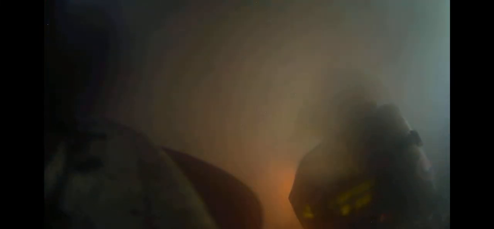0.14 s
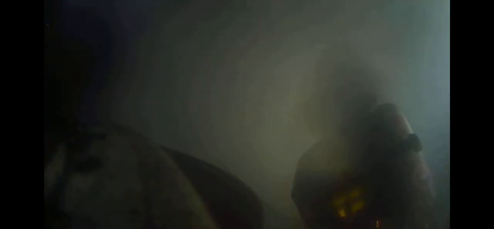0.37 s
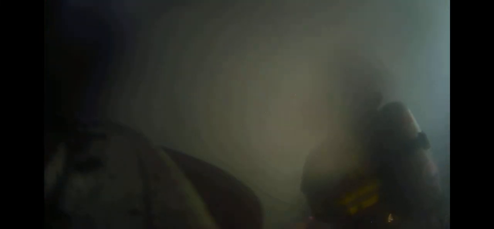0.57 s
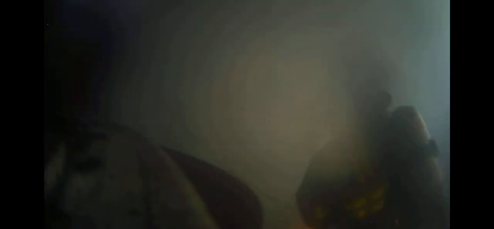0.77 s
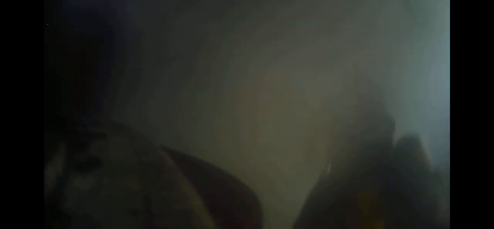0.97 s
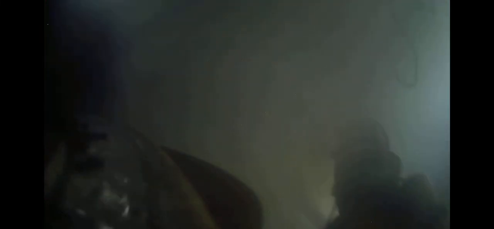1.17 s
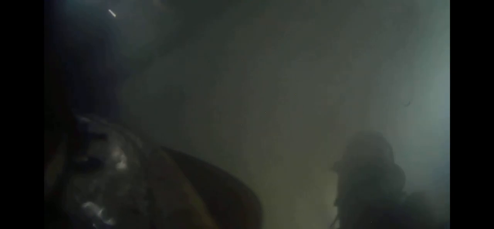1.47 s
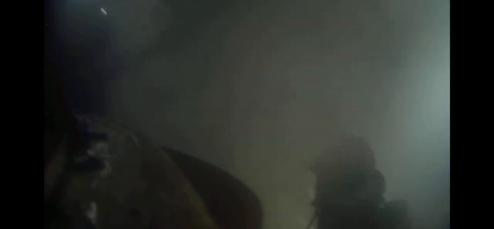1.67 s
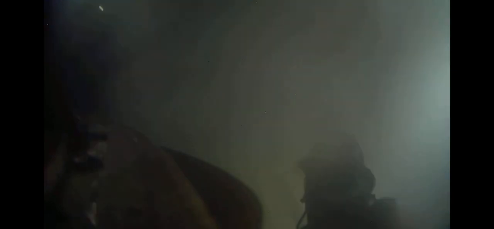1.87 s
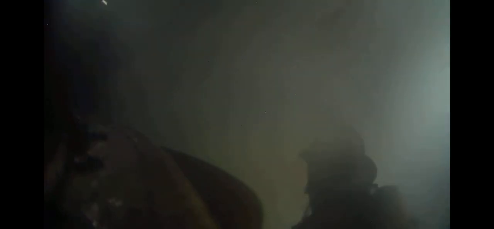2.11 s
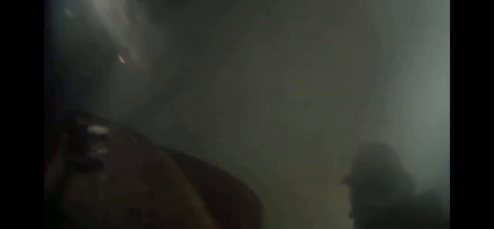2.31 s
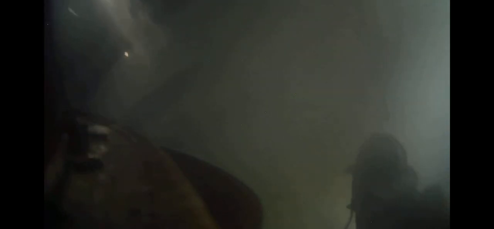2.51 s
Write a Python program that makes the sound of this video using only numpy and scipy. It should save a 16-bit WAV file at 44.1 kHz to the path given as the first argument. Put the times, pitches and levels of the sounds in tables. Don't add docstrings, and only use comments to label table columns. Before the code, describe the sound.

A fire hose jet hisses and surges close by, muffled, with low bumps of gear inside a smoky building

```python
import sys
import numpy as np
from scipy import signal
from scipy.io import wavfile
from scipy.ndimage import uniform_filter1d

SR = 44100
rng = np.random.default_rng(int(sys.argv[2]) if len(sys.argv) > 2 else 0)


def generate_wav(sig):
    pcm = np.round(np.clip(np.atleast_2d(sig).T, -1, 1) * 32767).astype(np.int16)
    wavfile.write(sys.argv[1], SR, pcm)


def decibels_to_gain(level_db):
    exponent = np.asarray(level_db, float) / 20
    return 10 ** exponent


N = 116865
TIME_S = np.arange(N) / SR


def evened(x):
    return x / np.sqrt(np.mean(x ** 2) + 1e-20)


def read(points, hz):
    f, value = np.transpose(points)
    return np.interp(np.log(hz + 1), np.log(f + 1), value)


def add(mix, s, sound):
    part = mix[max(round(s * SR), 0):][:len(sound)]
    part += sound[:len(part)]


def drifting(n, size):
    smooth = uniform_filter1d(rng.standard_normal(n), size=size)
    return evened(uniform_filter1d(smooth, size=size))


def patchy(x, gain, patch_db, size=512):
    overlap = size * 3 // 4
    hz, _, z = signal.stft(x, SR, nperseg=size, noverlap=overlap)
    patches = uniform_filter1d(rng.standard_normal(z.shape), size=3, axis=0)
    patches = evened(uniform_filter1d(patches, size=20, axis=1))
    z = z * gain(hz)[:, None] * decibels_to_gain(patch_db * patches)
    return evened(signal.istft(z, SR, nperseg=size, noverlap=overlap)[1][:N])


def modes(table):
    return lambda hz: np.sqrt(sum((decibels_to_gain(db) / (1 + (2 * (hz - f) / w) ** 2)) ** 2 for f, w, db in table))


def swing(s, hz, db, half):
    t = TIME_S - s
    return decibels_to_gain(db) * np.exp(-(t / half) ** 2) * np.cos(2 * np.pi * hz * t)


def struck(t, hz, db, t60, rise_s):
    return decibels_to_gain(db - 60 * t / t60) * np.minimum(t / rise_s, 1) * np.sin(2 * np.pi * hz * t)


def jet_force():
    # time in seconds, level in dB, tilt of the fine spray in dB.
    jet_path = [(0.0, -43, -2.5), (0.31, -48, -3.5), (0.55, -56.5, 6), (0.71, -43.5, 2.5), (0.94, -46.5, 2),
                (1.11, -49, 3.5), (1.59, -48.5, 2), (1.74, -52.5, 4), (1.87, -49, 1.5), (2.32, -51.5, 0.5),
                (2.65, -46, 2)]
    # centre in seconds, level in dB, half width in seconds, fine spray in dB.
    surges = [(.02, -54, 0.038, 0), (.14, -45, 0.036, 6.5), (0.228, -43.5, 0.027, -1),
              (0.364, -44.5, 0.017, -9), (.47, -48, 0.036, 1.5), (0.544, -42, 0.042, 4.5),
              (0.593, -40.5, 0.029, -15), (.668, -42, 0.019, -5), (.702, -35.5, .024, 1.5),
              (.75, -42.5, 0.026, -17), (.81, -49, 0.037, 6), (0.858, -40.5, 0.023, -4),
              (0.962, -47.5, 0.0087, 6), (1.055, -44, 0.032, -3), (1.118, -47, 0.022, -1),
              (2.035, -45.5, 0.018, 0.5), (1.379, -41.5, 0.04, 2), (1.35, -56, 0.016, -4),
              (1.431, -42, 0.023, -26), (1.576, -43.5, 0.028, 1), (1.71, -48.5, 0.028, 3),
              (1.77, -43.5, 0.038, -2.5), (1.92, -45, 0.0086, 5.5), (.16, -50, .01, 10),
              (1.39, -53, .03, 8), (2.09, -42.5, .02, -6), (1.82, -49.5, 0.016, -1),
              (2.235, -50.5, .006, 7), (2.077, -32.5, 0.011, -1.5), (2.118, -44.5, 0.028, 1.5),
              (2.247, -46, 0.02, 3.5), (2.348, -45.5, 0.016, -2), (2.411, -43.5, 0.016, -5),
              (2.52, -46.5, 0.049, -0.5), (2.61, -56, 0.025, -6)]
    fall_over_rise = 0.96
    s, db, tilt_db = np.transpose(jet_path)
    body = decibels_to_gain(np.interp(TIME_S, s, db)) ** 2
    fine = body * decibels_to_gain(np.interp(TIME_S, s, tilt_db)) ** 2
    for at, top_db, half, fine_db in surges:
        width = half * np.where(TIME_S > at, fall_over_rise, 1)
        swell = decibels_to_gain(top_db) ** 2 * np.exp(-((TIME_S - at) / width) ** 2)
        body = body + swell
        fine = fine + swell * decibels_to_gain(fine_db) ** 2
    return np.sqrt(body), np.sqrt(fine)


def water():
    drops_per_s, drop_spread_db, drop_share, flicker_db = 3000, 2, .25, 1
    drops = decibels_to_gain(drop_spread_db * np.minimum(rng.exponential(1, N), 3.5))
    drops = drops * (rng.random(N) < drops_per_s / SR)
    drops = drops * rng.choice([-1., 1.], N)
    flicker = decibels_to_gain(flicker_db * drifting(N, 500))
    hiss = rng.standard_normal(N)
    return flicker * (np.sqrt(drop_share) * evened(drops) + np.sqrt(1 - drop_share) * hiss)


def spray(body, fine):
    # pitch in Hz, width in Hz, level in dB.
    body_modes = [(1204, 33, -2), (1389, 183, 2.5), (1644, 355, -1.5), (2035, 370, -1.5), (2276, 190, -3),
                  (2572, 144, -10.5)]
    # pitch in Hz, width in Hz, level in dB.
    fine_modes = [(3334, 420, -4.5), (3681, 437, 1), (5570, 340, -12.5), (6380, 330, -17),
                  (6710, 530, -12.5), (7650, 840, -18), (9740, 1300, -28.5), (13100, 2700, -32.5)]
    patch_db, fine_level_db = 1, -17.5
    x = water()
    low = body * patchy(x, modes(body_modes), patch_db)
    high = fine * patchy(x, modes(fine_modes), patch_db)
    return low + decibels_to_gain(fine_level_db) * high


def wash(body):
    # frequency in Hz, density in dB per Hz.
    wash_spectrum = [(8.8, -30), (15, 4.5), (34, -4.5), (108, -14.5), (170, -12), (226, -18), (368, -18.5),
                     (871, -38), (1100, -21.5), (1430, -47), (2420, -120)]
    # time in seconds, level in dB.
    drag = [(0.0, -56), (0.43, -64), (0.46, -55), (0.66, -64), (0.69, -54), (0.8, -57.5), (1.13, -56),
            (1.22, -60), (1.42, -52.5), (1.58, -62.5), (1.81, -55.5), (1.97, -63), (2.08, -52.5),
            (2.13, -61.5), (2.63, -60), (2.65, -57)]
    wash_db, follows_jet, patch_db = -45.5, 0.31, 1.5
    deep_hz, deep_db = 63, -3

    def colour(hz):
        return decibels_to_gain(read(wash_spectrum, hz)) * (hz < 1300) * (hz > 10)

    low = patchy(rng.standard_normal(N), colour, patch_db, size=2048)
    deep = signal.sosfiltfilt(signal.butter(2, deep_hz, fs=SR, output="sos"), low)
    effort = evened(body ** follows_jet * decibels_to_gain(np.interp(TIME_S, *np.transpose(drag))))
    return decibels_to_gain(wash_db) * ((low - deep) * effort + decibels_to_gain(deep_db) * deep)


def microphone_hiss(dry):
    # frequency in Hz, density in dB per Hz.
    hiss_spectrum = [(400, 0), (900, -28), (4500, -7), (9000, -8), (14500, -11), (15300, -12), (15700, -20),
                     (15800, -70)]
    hiss_db, follows_level = -69, 0.082
    hiss = patchy(rng.standard_normal(N), lambda hz: decibels_to_gain(read(hiss_spectrum, hz)), 0.63)
    loud = abs(uniform_filter1d(np.diff(dry[0], prepend=0) ** 2, size=400)) + 1e-12
    return decibels_to_gain(hiss_db) * hiss * evened(loud ** follows_level)


def jolts():
    # centre in seconds, peak in dB, pitch in Hz, half width in seconds.
    jolt_list = [(0.061, -45.5, 43, 0.11), (.175, -35, 25, 0.043), (0.213, -23, 34.5, 0.017),
                 (0.244, -30.5, 24, 0.018), (0.288, -31, 25, 0.038), (.497, -32.5, 34, 0.028),
                 (0.556, -42, 21, 0.17), (0.688, -34.5, 49, 0.014), (0.73, -24, 29, 0.014),
                 (0.778, -28, 29, 0.012), (0.816, -27.5, 27, 0.016), (0.861, -28, 14.4, 0.032),
                 (1.018, -48, 31, 0.048), (1.103, -39, 18, 0.025), (1.292, -42, 26.5, 0.075),
                 (1.551, -37, 17, 0.021), (1.78, -43, 23.5, 0.093), (1.028, -46.5, 90, 0.012),
                 (2.631, -42, 110, 0.014), (0.449, -44, 95, 0.029), (2.117, -33.5, 48, 0.012),
                 (2.153, -36, 28, 0.028), (2.202, -43.5, 32, 0.035), (2.298, -45.5, 34, 0.067),
                 (0.411, -44, 54, 0.017), (1.075, -44.5, 56, 0.014), (1.151, -47, 47, .015),
                 (1.505, -44, 50, .015), (1.745, -40, 45, 0.016), (1.853, -42, 50, 0.01),
                 (2.03, -42, 38, 0.017), (2.359, -45.5, 59, .015), (2.55, -45.5, 60, 0.013),
                 (0.779, -39, 67, 0.014), (1.62, -44.5, 39, 0.018)]
    return -sum(swing(s, hz, db, half) for s, db, hz, half in jolt_list)


def slaps():
    # start in seconds, pitch in Hz, level in dB,
    # 60 dB decay in seconds.
    slap_list = [(.7025, 1750, -38, 0.026), (2.0706, 1425, -24.5, .015), (2.0738, 2050, -27, 0.019),
                 (.1166, 1430, -35, .015), (.2134, 1270, -41, 0.014), (.2658, 2030, -43, .015),
                 (.3431, 1400, -37, 0.017), (.5053, 2330, -36, .015), (.5322, 2050, -33, 0.017),
                 (.5457, 1440, -29, 0.023), (.5841, 1400, -34, 0.022), (.6639, 2030, -43, .02),
                 (.6823, 2170, -24.5, 0.02), (.7941, 1350, -37, .015), (.838, 1198, -38, 0.024),
                 (1.271, 1870, -31.5, 0.019), (1.3428, 1484, -36, .015), (1.3733, 1290, -30.5, 0.029),
                 (1.9051, 1580, -37, .015), (1.918, 1600, -33, 0.013), (2.2283, 1380, -41, 0.013),
                 (2.4124, 1397, -35, .015), (2.0855, 1720, -25.5, 0.017),
                 (.6949, 2040, -17.5, .012),
        (.6872, 1750, -26, .01),
        (.7035, 2150, -30, .05),
    ]
    out, t = np.zeros(N), np.arange(0, .1, 1 / SR)
    for s, hz, db, t60 in slap_list:
        add(out, s, struck(t, hz, db, t60, rise_s=.001))
    return out


def bumps():
    # start in seconds, peak in dB, pitch in Hz, 60 dB decay in seconds.
    bump_list = [(.14, -38.5, 134, 0.071), (.18, -43, 224, 0.1), (0.21, -41, 142, 0.15),
                 (.34, -36.5, 157, 0.18), (0.58, -37.5, 153, 0.18), (0.66, -42, 201, 0.12),
                 (0.739, -45.5, 155.3, 0.26), (0.75, -43.5, 255, 0.054), (0.89, -44.5, 265, 0.13),
                 (0.932, -43, 183, 0.041), (1.325, -43.5, 330, 0.12), (1.399, -51.5, 412, 0.13),
                 (1.46, -44.5, 425, 0.064), (1.385, -42, 277, 0.13), (1.1, -48.5, 305, 0.11),
                 (.8, -45.5, 200, 0.14), (0.12, -46.5, 280, .1), (1.41, -45, 390, .12),
                 (1.2, -44.5, 280, 0.11), (0.9, -43, 135, 0.14), (.29, -46.5, 140, .1),
                 (1.5, -45, 253, 0.056), (1.709, -45.5, 139, 0.32), (1.759, -40.5, 311, 0.18),
                 (1.802, -42.5, 140, 0.14), (1.977, -47, 129, 0.23), (2.064, -35.5, 123, 0.21),
                 (2.066, -38, 230, 0.14), (2.267, -44, 127, 0.099), (2.457, -43.5, 103, 0.16)]
    rise_s, sag, sag_s, rough = .014, .08, .012, .25
    out, t = np.zeros(N), np.arange(0, .3, 1 / SR)
    rise = np.sin(np.pi / 2 * np.minimum(t / rise_s, 1)) ** 2
    for s, db, hz, t60 in bump_list:
        edge = 1 + rough * drifting(len(t), 200)
        pitch = hz * (1 + sag * np.exp(-t / sag_s))
        ring = np.sin(2 * np.pi * np.cumsum(pitch) / SR) * edge
        fall = decibels_to_gain(db - 60 * np.maximum(t - rise_s, 0) / t60)
        add(out, s, fall * rise * ring)
    return out


def rebounds():
    # centre in seconds, peak in dB, half width in seconds.
    pushes = [
        (0.87, -37, 0.0061),
        (0.69, -22, 0.0062),
        (1.1, -36, 0.0067),
        (0.26, -39, 0.0039),
        (.15, -32.5, 0.0046),
        (2.8, -41, 0.0088),
    ]
    return sum(swing(s, 0, db, half) for s, db, half in pushes)


def buckle():
    out, t = np.zeros(N), TIME_S[:SR // 3]
    add(out, .695, struck(t, hz=1045, db=-46, t60=.3, rise_s=.0025))
    return out


def click():
    # centre in seconds, pitch in Hz, level in dB, half width in seconds.
    bounces = [
        (.9918, 1340, -24.5, .0009),
        (.99375, 1200, -29, .001),
        (.9962, 850, -32, .001),
        (.999, 700, -38, .0016),
        (.9926, 5600, -55, .001),
        (.9912, 4800, -56, .0008),
        (.9912, 6500, -57, .0008),
    ]
    return sum(swing(*bounce_row[:2], *bounce_row[2:]) for bounce_row in bounces)


def judders():
    # centre in seconds, peak in dB, slips per second, half width in seconds.
    strap_slips = [
        (1.3791, -33, 164, .015),
        (1.45, -40.5, 175, 0.013),
    ]
    overtones_db = [0, -8.5, -18]
    return sum(swing(s, (k + 1) * hz, db + fall_db, half)
               for s, db, hz, half in strap_slips for k, fall_db in enumerate(overtones_db))


def scene():
    body, fine = jet_force()
    jet = spray(body, fine) + wash(body) + slaps()
    helmet = jolts() + rebounds()
    gear = bumps() + buckle() + click() + judders()
    return (jet + helmet + gear)[None]


def low_pass(x):
    return signal.sosfilt(signal.butter(12, 15660, fs=SR, output="sos"), x)


def record(dry):
    heard = dry + microphone_hiss(dry)
    edge_hz = 15760
    heard = signal.sosfiltfilt(signal.butter(12, edge_hz, fs=SR, output="sos"), heard)
    return low_pass(heard)


dry = scene()
out = record(dry)
generate_wav(out)
```